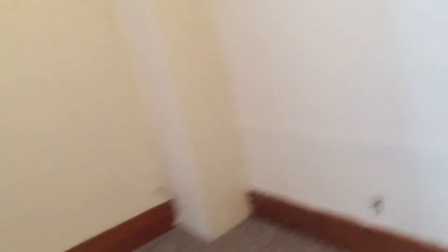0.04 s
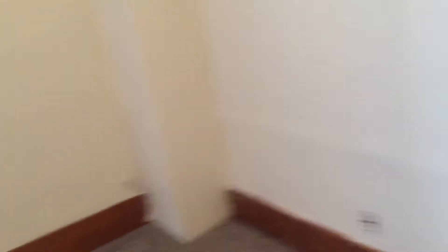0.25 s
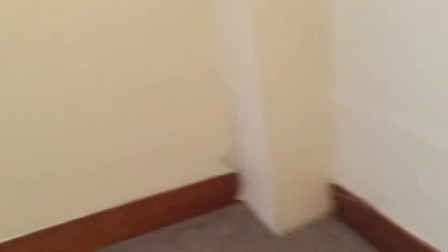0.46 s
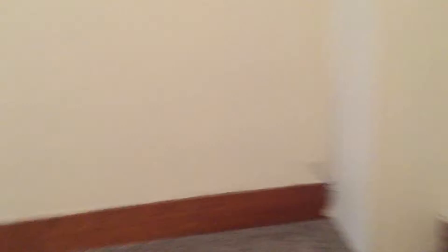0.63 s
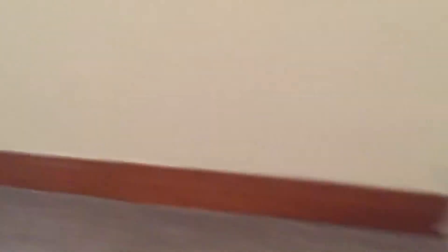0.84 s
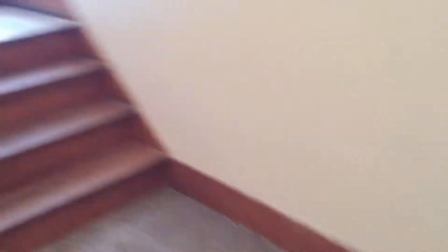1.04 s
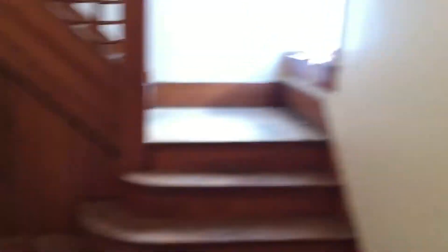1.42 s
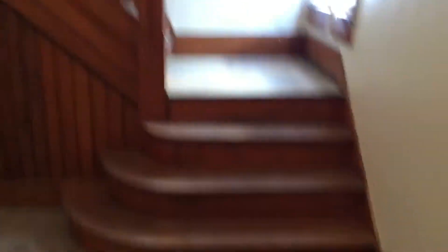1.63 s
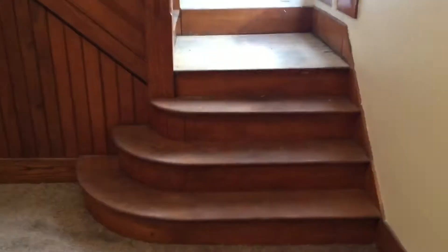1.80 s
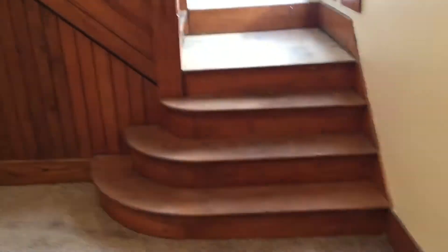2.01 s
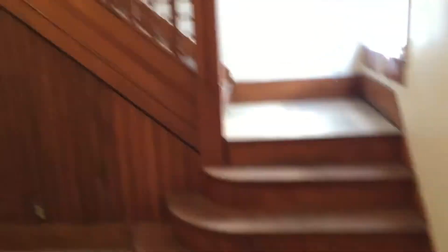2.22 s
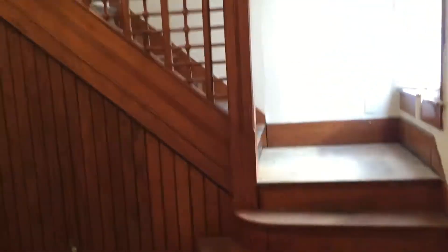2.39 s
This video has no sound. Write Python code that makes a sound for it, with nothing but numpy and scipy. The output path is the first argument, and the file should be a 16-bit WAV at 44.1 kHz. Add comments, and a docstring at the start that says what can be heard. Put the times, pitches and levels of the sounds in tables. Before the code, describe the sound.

Soft footsteps thud and scuff on carpet over wooden boards, at about 0.3, 0.5 and, heaviest, 0.8 seconds, with small floor ticks. From 1.3 to 1.6 seconds come dull microphone handling bumps and a rustle of soles and clothes. A last step near 1.8 seconds makes the boards groan briefly. A few faint thumps follow until 2.5 seconds, over low rumble and hiss in a slightly echoing empty room.

```python
"""Over a quiet background, someone turns and steps slowly on carpet over a wooden floor, camera in hand.
In the first second heels strike the boards and set their modes and the joists ringing. Soles and clothes
scuff by friction, floor joints tick, and floor and handled camera thump dully. Near 1.8 s a last step makes
the loaded boards groan, and a few faint thumps and ticks follow. The empty room's bare walls answer."""
import sys
import numpy as np
from scipy import signal
from scipy.fft import rfft, irfft, next_fast_len
from scipy.io import wavfile

SR = 44100
rng = np.random.default_rng(int(sys.argv[2]) if len(sys.argv) > 2 else 0)


def to_wav(s):
    """Save 16-bit WAV."""
    ch = np.atleast_2d(s).T  # columns
    pcm = np.round(np.clip(ch, -1, 1) * 32767)  # PCM
    wavfile.write(sys.argv[1], SR, pcm.astype(np.int16))


N = 112454
T = np.arange(N) / SR


def undb(db):
    """Amplitude ratio of a level in decibels."""
    return 10 ** (np.asarray(db) / 20)


def unit(x):
    """Normalisation to an rms of one."""
    return x / np.sqrt(np.mean(x ** 2) + 1e-20)


def shape(x, gain):
    """Linear filtering: the spectrum is multiplied by a gain that depends on frequency."""
    length = x.shape[-1]
    size = next_fast_len(length + 4096)
    hz = np.maximum(np.arange(size // 2 + 1) * SR / size, 1)
    return irfft(rfft(x, size) * gain(hz), size)[..., :length]


def colour(x, points):
    """Spectral shaping by (Hz, dB) points, at unit rms."""
    hz, db = np.array(points).T
    return unit(shape(x, lambda f: undb(np.interp(np.log(f), np.log(hz), db))))


def add(out, start, x):
    """Superposition: a sound joins the mix at its start in seconds."""
    i = max(int(start * SR), 0)
    out[i:i + len(x)] += x[:max(N - i, 0)]


# Background spectrum. Each row: frequency in Hz, relative level in dB.
AIR_SPECTRUM = [(20, -27), (40, 0.5), (59, -1), (84, -4), (150, -4), (230, -13), (370, -18), (540, -20),
                (1450, -23.5), (2420, -24.5), (5000, -30.5), (9000, -34), (10300, -36.5), (12000, -35.5),
                (15500, -38.5)]
# Course of the background. Each row: time in seconds, level in dB.
AIR_LEVELS = [(0, -61), (1.2, -60), (2.0, -62.5), (2.5, -65)]

def background():
    """Broadband noise: the faint rumble and hiss of the empty house."""
    level_db = np.interp(T, *np.array(AIR_LEVELS).T)
    return colour(rng.standard_normal(N), AIR_SPECTRUM) * undb(level_db)


# Decay of the room. Each row: frequency in Hz, reverberation time in seconds.
REVERB_TIMES = [(60, 0.97), (200, 0.43), (600, 0.51), (1500, 0.32), (4000, 0.09), (12000, 0.58)]
# Colour of the reflections. Each row: frequency in Hz, relative level in dB.
REVERB_SPECTRUM = [(60, -9), (140, -2), (240, 0), (600, -3), (1500, -2.5), (8000, -0.5)]

def room_response(first_wall_s=0.0022, build_s=0.005):
    """Reverberation: dense reflections from bare walls die exponentially, each octave at its own rate."""
    t = T[:SR]
    hz, t60 = np.array(REVERB_TIMES).T
    noise, tail = rng.standard_normal(len(t)), 0
    for centre in 2. ** np.arange(5, 15):
        band = shape(noise, lambda f: np.maximum(1 - np.abs(np.log2(f / centre)), 0))
        band_t60 = np.interp(np.log(centre), np.log(hz), t60)
        tail = tail + band * undb(-60 * t / band_t60)
    tail = colour(tail, REVERB_SPECTRUM) * np.clip((t - first_wall_s) / build_s, 0, 1)
    return tail / np.sqrt(np.sum(tail ** 2))


# Low, dull thumps of the floor under a step and of the handled camera.
# Each row: start in seconds, level in dB, frequency in Hz, decay in seconds.
LOW_THUMPS = [(0.18, -53.5, 195, 0.011), (0.212, -43.5, 77.5, 0.0054), (0.267, -51.5, 79, 0.014),
              (0.342, -39, 144, 0.011), (.7655, -31, 465, 0.0023), (0.769, -34, 135, 0.0048),
              (0.854, -46.5, 56, 0.028), (1.31, -41, 87, 0.0076), (1.34, -41.5, 120, 0.0076),
              (1.366, -36.5, 63, 0.01), (1.417, -41.5, 60, 0.019), (1.457, -37.5, 69, 0.0058),
              (1.509, -36, 90, 0.0057), (1.536, -40, 76, 0.008), (1.572, -34.5, 89, 0.0044),
              (1.598, -38, 82, 0.003), (1.651, -50.5, 74, 0.012), (1.731, -49.5, 180, 0.0052),
              (1.75, -37.5, 107, 0.017), (2.096, -46, 98, 0.0019), (1.825, -44.5, 53.8, 0.028),
              (2.255, -45.5, 57, 0.018), (2.394, -55.5, 112, 0.0044)]

def low_thumps():
    """Heavily damped vibration: a thump of floor or camera swells and dies in a few low cycles."""
    out, t = np.zeros(N), T[:SR // 3]
    for start, db, hz, decay in LOW_THUMPS:
        envelope = t / decay * np.exp(1 - t / decay)
        add(out, start, -undb(db) * np.sin(2 * np.pi * hz * t) * envelope)
    return out


# Ticks, taps and short creaks of shoes and floor.
# Each row: start in seconds, level in dB, centre in Hz, bandwidth in Hz, decay in seconds.
SLIP_TICKS = [(.3375, -37, 1510, 910, 0.0042), (.338, -40.5, 2830, 1190, 0.0031),
              (0.337, -56, 6000, 7000, 0.0012), (0.348, -59.5, 3540, 2390, 0.025),
              (0.525, -49, 2950, 300, 0.0082), (.555, -47.5, 298, 69.4, 0.04),
              (0.531, -51, 8750, 7000, 0.0049), (.768, -40, 660, 960, 0.0098),
              (0.787, -57, 6530, 5000, 0.007), (.838, -43, 383, 109, 0.015), (.905, -55, 3520, 1390, 0.032),
              (1.068, -53.5, 2490, 570, 0.004), (1.157, -56, 432, 299, 0.016),
              (1.1705, -46.5, 620, 440, 0.0033), (1.235, -57.5, 398, 156, 0.041),
              (1.31, -54.5, 2630, 895, 0.042), (1.31, -67.5, 9000, 8000, 0.012),
              (1.404, -51, 1500, 2500, 0.0021), (1.634, -61, 11500, 8000, .0018),
              (1.747, -49, 1510, 1100, 0.0032), (1.77, -62, 2300, 400, 0.018),
              (2.536, -56, 2050, 400, 0.0043)]

def slip_ticks(rise_s=0.00039, ceiling_hz=17750):
    """Transient excitation: a joint or sole slips and gives a short burst of band-limited noise."""
    out, t = np.zeros(N), T[:SR // 4]
    for start, db, hz, width_hz, decay in SLIP_TICKS:
        low = np.hypot(hz, width_hz / 2) - width_hz / 2  # the centre is a geometric mean
        band = signal.butter(2, [low, min(low + width_hz, ceiling_hz)], "band", fs=SR, output="sos")
        envelope = np.exp(-t / decay) * (1 - np.exp(-t / rise_s))
        burst = signal.sosfilt(band, rng.standard_normal(len(t)) * envelope)
        add(out, start, undb(db) * unit(burst) * np.sqrt(np.mean(envelope ** 2)))
    return out


def friction_grains(size, slips_per_s=2500, spread_db=3):
    """Stick-slip friction: dense tiny impulses of uneven strength, over finer noise."""
    slips = rng.random(size) < slips_per_s / SR
    strength = undb(spread_db * np.minimum(rng.exponential(size=size), 4))
    polarity = rng.choice([-1, 1], size)
    return unit(slips * strength * polarity) + 0.84 * rng.standard_normal(size)


def sole_grip(t, catches_per_s=138.4, depth_db=1.43):
    """Amplitude modulation: a sliding sole grips and frees unevenly."""
    wander = np.interp(t * catches_per_s, np.arange(256), rng.standard_normal(256))
    return unit(undb(depth_db * wander))


# Spectra of the three parts of a scuff. Each row: frequency in Hz, relative level in dB.
DRAG_SPECTRUM = [(60, -50), (130, -3), (210, 1.5), (290, -8), (370, -6.5), (500, -12), (700, -16),
                 (1100, -29.5), (3000, -70)]
RUB_SPECTRUM = [(250, -32), (600, 3), (1000, 5.5), (1400, 3), (1800, 1), (2200, -3), (3000, -2), (4500, -8),
                (7000, -14), (15000, -34)]
HISS_SPECTRUM = [(1000, -41), (3000, -1), (5000, -1), (7000, -4), (9000, -5), (10300, -10), (12000, -8.5),
                 (15500, -12)]
# Scuffs of sole and clothing. Each row: start, rise, hold and fall in seconds,
# drag and rub levels in dB, centre of the rub in Hz, hiss level in dB.
SCUFF_STROKES = [(0.192, 0.014, 0.12, 0.031, -59, -58.5, 1470, -70.5),
                 (0.301, 0.03, 0.021, 0.068, -48.5, -55, 1630, -94),
                 (0.506, 0.019, 0.0034, 0.01, -44.5, -53, 2580, -62),
                 (0.523, 0.022, 0.022, 0.052, -43.5, -48.5, 1290, -68),
                 (0.678, 0.019, 0.041, 0.078, -54.5, -57.5, 1310, -67),
                 (0.763, 0.013, 0.018, 0.032, -50, -52, 2400, -57.5),
                 (0.802, 0.023, 0.029, 0.067, -57.5, -52.5, 1760, -96),
                 (.85, 0.017, 0.049, 0.044, -56, -90, 380, -85),
                 (0.978, 0.038, 0.064, 0.016, -67, -64.5, 2490, -76.5),
                 (1.249, 0.0094, 0.02, 0.033, -67, -64, 1850, -71),
                 (1.293, 0.014, 0.081, 0.024, -57.5, -55, 2420, -64.5),
                 (1.345, 0.044, 0.022, 0.064, -52, -50, 2230, -73),
                 (1.43, 0.035, 0.062, 0.039, -57, -66, 1210, -93),
                 (1.632, 0.04, .005, 0.11, -76, -70, 3000, -72),
                 (1.744, 0.0098, 0.055, 0.027, -49.5, -59, 990, -77.5),
                 (2.037, 0.048, 0.0029, 0.011, -83, -65, 1420, -75),
                 (2.209, 0.015, 0.018, 0.0091, -68.5, -71, 700, -85)]

def scuffs(rub_db_per_octave=3.5):
    """Sliding friction: fibres catch and let go, giving a low drag, a mid-range rub and a hiss."""
    out, t = np.zeros(N), T[:SR // 2]
    for start, rise, hold, fall, drag_db, rub_db, centre_hz, hiss_db in SCUFF_STROKES:
        envelope = np.minimum(t / rise, 1) * np.exp(-np.maximum(t - rise - hold, 0) / fall)
        drag = colour(friction_grains(len(t)), DRAG_SPECTRUM)
        rub = colour(friction_grains(len(t)), RUB_SPECTRUM)
        hiss = colour(friction_grains(len(t)), HISS_SPECTRUM)
        rub = unit(shape(rub, lambda f: undb(-rub_db_per_octave * np.abs(np.log2(f / centre_hz)))))
        sliding = sole_grip(t) * (undb(rub_db) * rub + undb(hiss_db) * hiss)
        add(out, start, envelope * (undb(drag_db) * drag + sliding))
    return out


# Course of the groan. Each row: time in seconds, level in dB.
GROAN_LEVELS = [(1.78, -53.5), (1.81, -54.5), (1.84, -54), (1.885, -60.5), (1.9, -75)]
# Colour of the groan. Each row: frequency in Hz, relative level in dB.
GROAN_SPECTRUM = [(200, -21), (400, -14), (600, 8), (800, 4.5), (980, 5), (1200, -40), (2500, -51)]

def board_groan():
    """Friction under load: boards rub together beneath the full weight, muffled by the carpet."""
    times, db = np.array(GROAN_LEVELS).T
    envelope = np.interp(T, times, undb(db), left=0, right=0)
    return colour(friction_grains(N), GROAN_SPECTRUM) * envelope


def ring(modes, t, detune=0.025):
    """Modal vibration: a sum of damped sines of alternating sign, a little different at each spot."""
    out = 0
    for k, (hz, db, t60) in enumerate(modes):
        amplitude = (-1) ** k * undb(db + rng.normal())
        spot_hz = hz * (1 + detune * rng.normal())
        out = out + amplitude * np.sin(2 * np.pi * spot_hz * t) * undb(-60 * t / t60)
    return out


# Modes of the floor. Each row: frequency in Hz, relative level in dB, time to fall 60 dB in seconds.
BOARD_MODES = [(117.3, 1.5, 0.13), (148.7, 8, 0.076), (202.4, 5, 0.14), (235, -1, 0.12), (291.8, -5, 0.22),
               (385, -1.5, 0.072), (457.3, -4.5, 0.11), (512, -4, 0.09), (663, 3, 0.046), (955, -7, 0.092),
               (1344, 2, .065), (1627, -3.5, 0.19)]
JOIST_MODES = [(54, 8.5, 0.27), (82.6, 3, 0.29), (102.5, 3, 0.15)]
# Blows of the feet. Each row: start in seconds, relative level in dB, joist boom relative to that in dB,
# lower and upper cutoffs of the contact in Hz.
FOOT_BLOWS = [(.195, -10.5, -16, 120, 268), (.275, -9, -6.5, 193, 1150), (.343, -13, -6, 160, 443),
              (.522, -8, -30, 260, 1900), (0.534, -7, -30, 130, 332), (0.5413, -7.5, -26, 328, 1680),
              (.548, -1.5, -32, 255, 1440), (0.697, -5.5, -4.5, 90.5, 457), (0.7654, -7.5, 5.5, 247, 1320),
              (0.777, -3, 0.5, 92, 480), (0.794, -3, 3.5, 80, 447), (.826, -5.5, 6, 90, 640),
              (0.836, -6.5, -2, 216, 1380), (1.749, -5.5, -12, 69, 720), (1.773, -7.5, -4, 98, 600),
              (1.806, -5, 2, 128, 950), (1.834, -6, 1, 109, 835), (1.871, -22.5, 10.5, 150, 690)]

def footfalls(step_db=-42, crack_db=8, crack_s=0.016):
    """Impact excitation: each blow rings the boards; a flat, heavy one also sets the joists booming."""
    boards, joists, t = np.zeros(N), np.zeros(N), T[:SR // 2]
    for start, db, boom_db, low_hz, high_hz in FOOT_BLOWS:
        ringing = ring(BOARD_MODES, t)
        crack = undb(crack_db) * rng.standard_normal(len(t)) * np.exp(-t / crack_s)
        knock = signal.lfilter(*signal.butter(2, low_hz, "high", fs=SR), -(ringing + crack))
        carpet = signal.butter(4, high_hz, fs=SR, output="sos")  # a soft contact is a low-pass
        add(boards, start, undb(step_db + db) * signal.sosfilt(carpet, knock))
        add(joists, start, undb(step_db + db + boom_db) * ring(JOIST_MODES, t))
    return boards, joists


def scene():
    """Direct and reverberant sound add: feet and boards echo, while joists and thumps arrive directly."""
    boards, joists = footfalls()
    scuff, groan, ticks = scuffs(), board_groan(), slip_ticks()
    to_walls = undb(-6) * boards + undb(-1.5) * scuff + undb(-7) * groan + undb(-2.5) * ticks
    echo = signal.fftconvolve(to_walls, room_response())[:N]
    return (boards + joists + scuff + groan + ticks + echo + low_thumps() + background())[None]


def record(dry, low_cut_hz=40.6, top_hz=15750):
    """Band limiting: the microphone drops the deepest bass and the highest treble."""
    thinned = shape(dry, lambda f: 1 / np.sqrt(1 + (low_cut_hz / f) ** 8))
    return signal.sosfilt(signal.ellip(10, .2, 70, top_hz, fs=SR, output="sos"), thinned)


dry = scene()
out = record(dry)
to_wav(out)
```